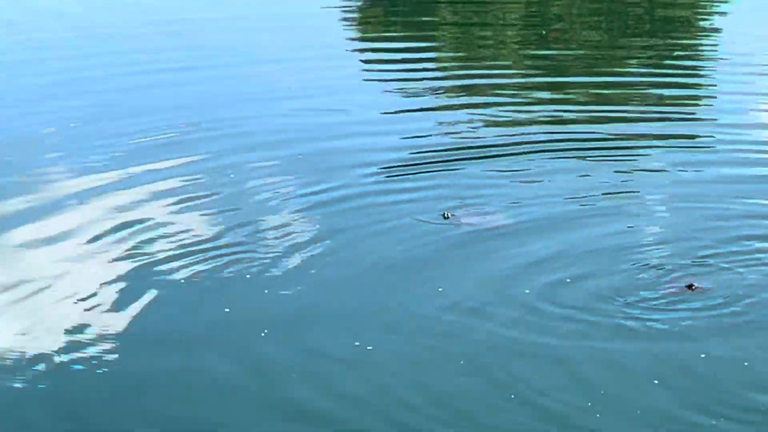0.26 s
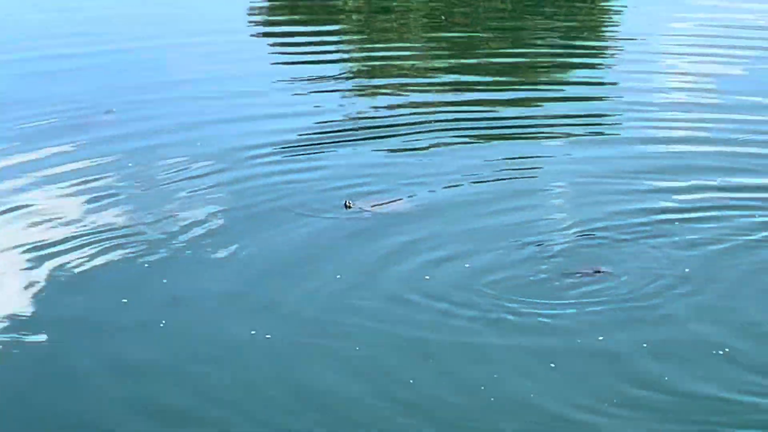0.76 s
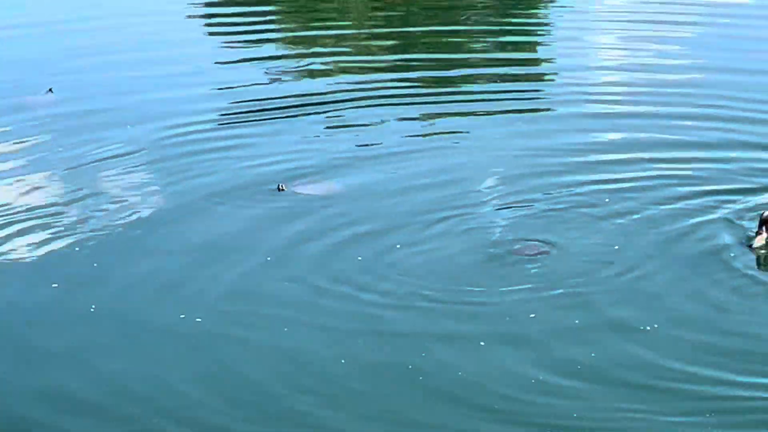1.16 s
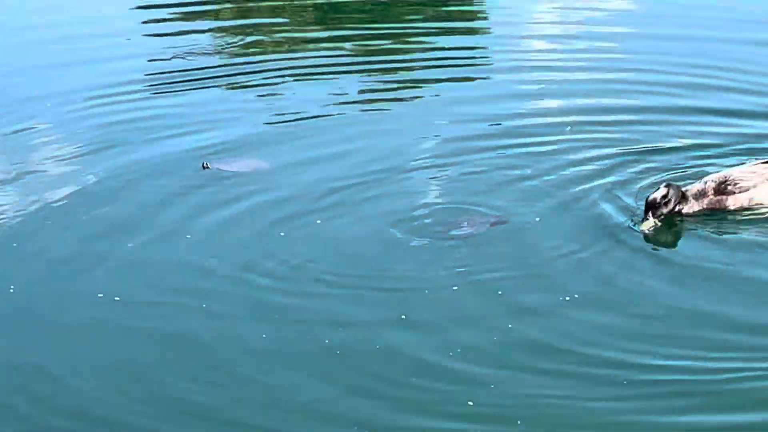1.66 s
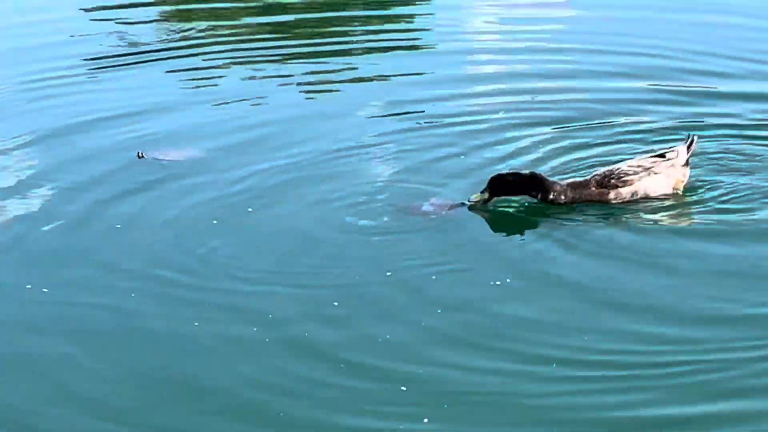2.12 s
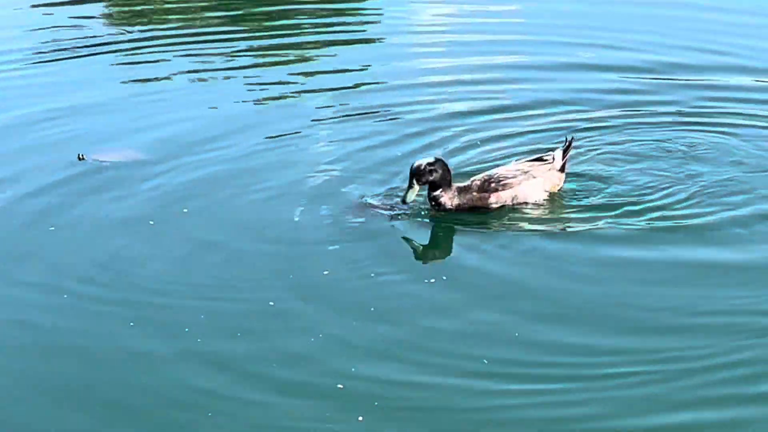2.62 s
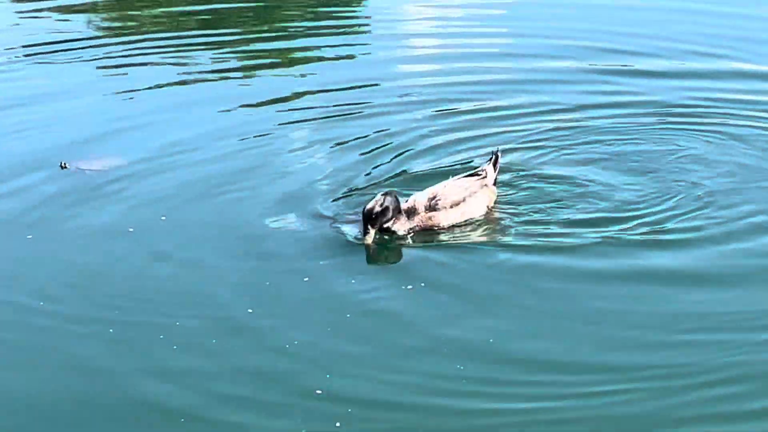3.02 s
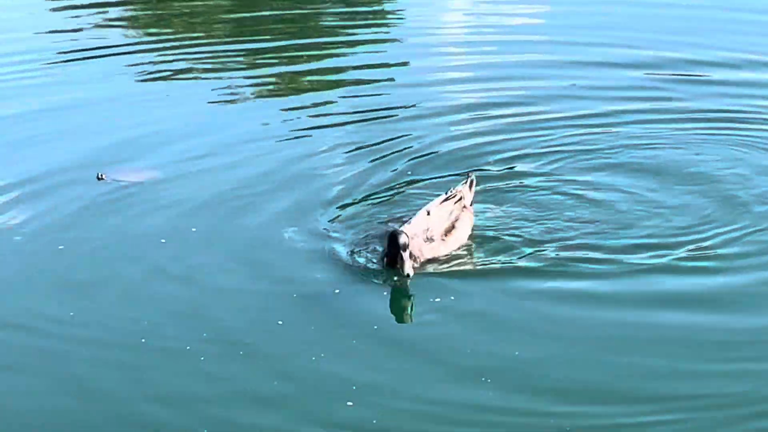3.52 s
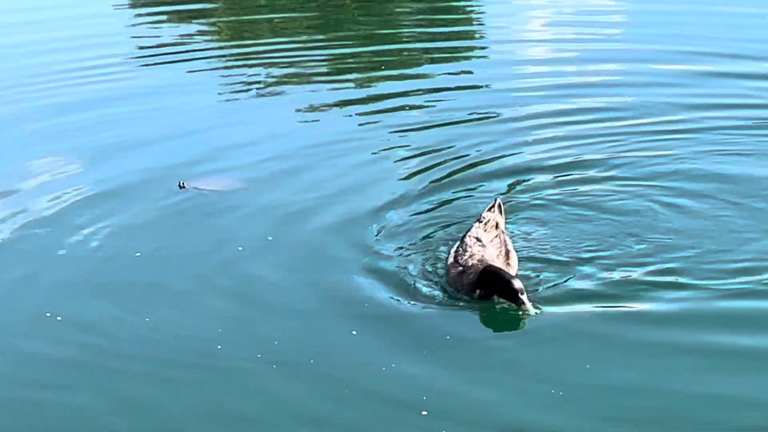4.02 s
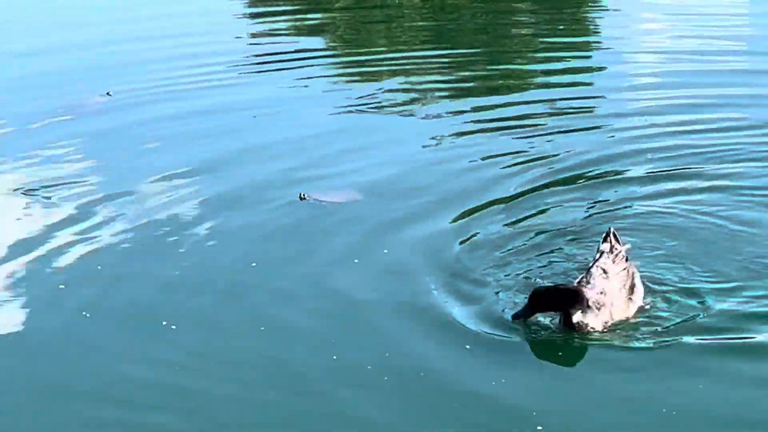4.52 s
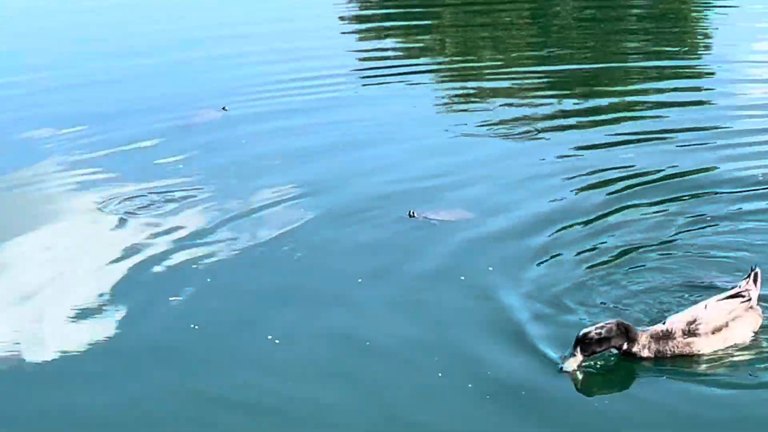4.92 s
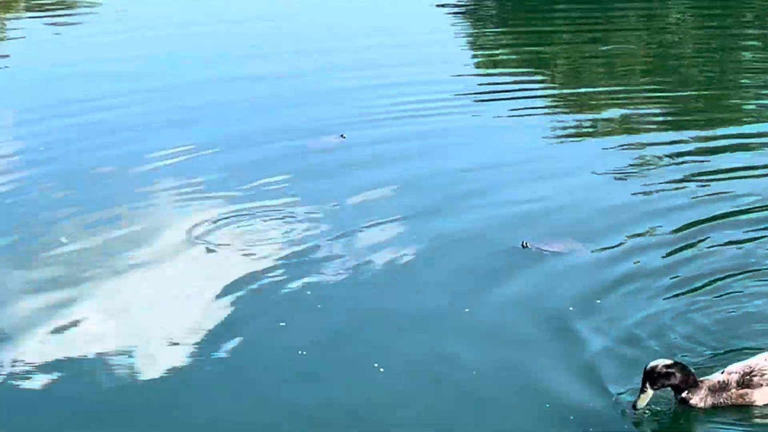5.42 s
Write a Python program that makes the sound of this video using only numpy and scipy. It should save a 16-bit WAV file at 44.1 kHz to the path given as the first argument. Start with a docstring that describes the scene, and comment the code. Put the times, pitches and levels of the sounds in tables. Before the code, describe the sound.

Outdoors by open water, shrill insects buzz without pause in rough, grainy stereo. Gusts flutter and thud directly on an unprotected microphone, building to a rough patch just before halfway, followed by a calmer stretch. Short bird chips with soft echoes appear early, midway and late. Near the end, a duck's bill makes small liquid clicks and plips in front, over a faint wavering engine hum and background rumble.

```python
"""Cicadas drone in the trees to one side of a summer pond, swelling and easing, as gusts buffet the microphone.
The insects are noise gated by uneven click trains; two ports hear them out of step, so the drone is very wide.
Wind is shaped noise with shed eddies and hard buffets; a small bird chips three times in short pitch sweeps.
A dabbling duck makes wet ticks, as snaps, ringing bubbles and drops; a far motor hums in wavering sines
within a rumble of filtered noise."""
import sys
import numpy as np
from scipy import signal
from scipy.fft import rfft, irfft
from scipy.io import wavfile
from scipy.ndimage import uniform_filter1d

SR = 44100
rng = np.random.default_rng(int(sys.argv[2]) if len(sys.argv) > 2 else 0)


def dump(signal):
    """Clip the signal to [-1, 1] and save it as 16-bit WAV at the path in sys.argv[1]."""
    limited = np.clip(np.atleast_2d(signal).T, -1, 1)
    pcm = np.round(limited * 32767).astype(np.int16)
    wavfile.write(sys.argv[1], SR, pcm)


N = 250047
TIME = np.arange(N) / SR
FREQS = np.fft.rfftfreq(N, 1 / SR)

# the duck's bill in the water, levels before the duck's overall gain:
# (time [s], bubble level [dB], ring pitch [Hz], ring time to -60 dB [s], snap peak [dB])
DABBLES = [(1.127, -54, 2220, 0.0083, -61.5), (3.861, -49, 1870, 0.014, -58),
           (4.169, -45.5, 1660, 0.0039, -50), (4.302, -50, 1540, 0.033, -59), (4.761, -50, 2460, .005, -63),
           (4.8178, -40, 2000, 0.009, -50), (4.8235, -44, 2100, .005, -44.5),
           (4.861, -48, 2300, .0065, -58), (4.962, -35.5, 1020, 0.022, -59), (4.978, -41, 780, .011, -43),
           (4.9785, -44, 2680, .0077, -64), (5.17, -34.5, 2600, 0.006, -60)]


def chorus():
    """Amplitude modulation in two bands: the song swells, and turns shriller as its top gains on the drone."""
    # swell of the chorus: (time [s], level of the main drone [dB], level of the shrill top [dB])
    swell = [(0.0, -47.5, -54), (0.33, -48, -54.5), (0.34, -49.5, -59), (0.59, -50.5, -57),
             (1.17, -47.5, -52), (1.39, -47.5, -55), (1.81, -45, -54), (1.9, -46.5, -51),
             (2.26, -45.5, -54.5), (2.81, -45, -50), (3.13, -42.5, -49), (4.01, -45, -52),
             (4.37, -49.5, -58), (5.1, -49.5, -57.5), (5.3, -49, -54), (5.6, -47, -52.5)]
    drone_db, shrill_db = curves(swell)
    # one group sings from the side, two more supply the scattered sound at the ports
    groups = [cicadas(click_hz=228.8, jitter=.08, flutter_db=1.5, blur=.35, count=4) for _ in range(3)]
    song = shimmer(from_trees(*groups), count=6)
    high_pass = signal.butter(4, 6300, "highpass", fs=SR, output="sos")
    shrill = signal.sosfiltfilt(high_pass, song)
    drone = song - shrill
    # each part has unit level in the mean of the two ports
    drone, shrill = (part / part.mean(axis=0).std() for part in (drone, shrill))
    return drone * undb(drone_db) + shrill * undb(shrill_db)


def cicadas(click_hz, jitter, flutter_db, blur, count):
    """Source and resonator: tymbals buckle in fast uneven trains of short bursts, coloured by the body."""
    # resonance of the insects' bodies: (frequency [Hz], level [dB])
    body = [(2700, -35), (3200, -22.0), (4050, -9.0), (4550, -7.4), (5450, 0.0), (5950, -0.3), (6550, -3.6),
            (7550, -15.7), (8400, -19.0), (9600, -29.6), (11500, -27.5), (12800, -33.0), (14000, -38.9)]
    power = np.zeros(N)
    for _ in range(count):
        rate = click_hz * rng.uniform(0.54, 1.4) * (1 + jitter * walk(40))
        phase = np.cumsum(rate) / SR % 1
        burst = np.exp(-phase / 1.06)
        power += (burst * undb(flutter_db * walk(70))) ** 2
    # foliage smears part of the song into an even hiss
    envelope = np.sqrt(power + blur * power.mean())
    return colour(envelope * rng.standard_normal(N), body)


def shimmer(song, count):
    """Independent modulation by band: insects of different pitch swell and ease on their own."""
    depth_db, changes_per_s = 1.0, 30
    whole = rfft(song)
    centres = np.geomspace(3500, 9000, count)
    total = 0
    # overlapping triangular bands that add up to the whole song
    for peak in np.eye(count):
        band = irfft(whole * np.interp(FREQS, centres, peak), N)
        total = total + band * undb(depth_db * walk(changes_per_s))
    return total


def from_trees(direct, stray_left, stray_right):
    """Interaural phase and coherence: sound from one side leads at the left, scattered sound is unrelated."""
    # the two ports: (frequency [Hz], phase by which left leads [rad], power share of scattered sound [0-1])
    ports = [(1800, 0, .3), (2600, 2.4, .15), (3300, 1.2, .15), (4000, .9, .09), (4550, 1.45, .08),
             (5100, 1.45, .08), (5850, 3.1, .005), (6200, 3.25, .015), (7200, 5.1, .16), (7650, 6.2, .04),
             (8750, 6.5, .1), (9650, 9.4, .02), (10850, 9.45, .02), (11800, 12.4, .04)]
    lead, share = spectra(ports)
    share = np.clip(share, 0, 1)
    straight = rfft(direct) * np.exp(.5j * np.array([lead, -lead]))
    stray = rfft(np.array([stray_left, stray_right]))
    return irfft(np.sqrt(1 - share) * straight + np.sqrt(share) * stray, N)


def wind():
    """Turbulent pressure on the ports: rumble, eddies and buffets, with a flutter that grows faster than the gust."""
    # fast flutter inside the eddies: (frequency [Hz], level [dB])
    flutter_spectrum = [(80, -4.5), (220, 6), (380, -6), (580, -12), (720, -17), (900, -22), (2000, -72)]
    # swirls that differ at the ports: (frequency [Hz], level [dB])
    apart_spectrum = [(20, -14), (60, -5.0), (130, -2.5), (300, -11.5), (550, -14.5), (1000, -48), (2000, -38.5)]
    gust_db = gusts()
    eddies = shedding(gust_db)
    rumble = turbulence() * undb(gust_db - 0.5)
    force = np.sqrt(uniform_filter1d(eddies ** 2, size=600) + undb(gust_db - 3.5) ** 2)
    flutter_db = -6.5 + .5 * (gust_db - gust_db.max()) + 2.2 * walk(70)
    flutter = colour(rng.standard_normal(N), flutter_spectrum) * force * undb(flutter_db)
    # this layer enters the ports with opposite sign
    apart = colour(rng.standard_normal(N), apart_spectrum) * undb(gust_db - 9.5)
    return widen(rumble + flutter + eddies + buffets(), apart)


def gusts():
    """Addition of powers: each gust swells and dies away over a light breeze; returns strength in dB."""
    # gusts: (time of the height [s], strength [dB], rise [s], fall [s])
    swells = [(.17, -41.5, 0.12, 0.13), (.78, -47, 0.095, 0.22), (1.5, -38.5, 0.029, 0.043),
              (2.25, -41, 0.51, 0.32), (2.62, -36.5, 0.18, 0.13), (2.93, -42, 0.047, 0.091),
              (3.258, -39.5, 0.067, 0.087), (4.37, -45, 0.036, 0.11), (5.0, -43.5, 0.12, 0.092)]
    breeze_db, lull_s, lull_width_s = -53, 3.9, 0.85
    # the breeze has one lull
    lull = np.exp(-((TIME - lull_s) / lull_width_s) ** 4)
    power = undb(breeze_db) ** 2 * (1 - lull)
    for s, db, rise, fall in swells:
        width = np.where(TIME < s, rise, fall)
        power = power + undb(db) ** 2 * np.exp(-((TIME - s) / width) ** 2)
    return 10 * np.log10(power + 1e-9)


def turbulence():
    """Broadband turbulence: low swirling pressure, compressed toward an even strength."""
    # spectrum of the swirl: (frequency [Hz], level [dB])
    wind_spectrum = [(15, -37), (30, -30), (48, 6), (78, 5), (125, 3), (200, -9), (320, -16.5), (500, -39),
                     (900, -45), (2000, -92)]
    swirl = colour(rng.standard_normal(N), wind_spectrum)
    return unit(swirl / np.sqrt(uniform_filter1d(swirl ** 2, size=1500) + 0.046))


def shedding(gust_db):
    """Vortex shedding: eddies come in a loose train, following the strength of the wind that sheds them."""
    shed_per_s, jitter_periods, spread_db = 14, 0.31, 4
    # typical pitch at the greatest wind strength, and its rise with strength
    eddy_hz, octaves_per_db = 103, 0.02
    # typical peak over the wind's strength, and Gaussian half-length
    over_gust_db, half_cycles = 2.3, 0.55
    air = np.zeros(N)
    for k, (late, strength, size) in enumerate(rng.standard_normal(size=(150, 3))):
        s = (k + 1 + jitter_periods * late) / shed_per_s
        if 0 < s < TIME[-1]:
            db = np.interp(s, TIME, gust_db)
            octaves = octaves_per_db * (db - gust_db.max()) + 0.2 * size
            swirl = eddy(eddy_hz * 2 ** octaves, half_cycles)
            add(air, max(s - .05, 0), undb(db + over_gust_db + spread_db * strength) * swirl)
    return air


def eddy(hz, half_cycles):
    """Scaling of vortices: a swirl of fixed cycle count, centred in a tenth of a second, is shorter when higher."""
    cycles = hz * (TIME[:SR // 10] - .05)
    return np.exp(-.5 * (cycles / half_cycles) ** 2) * np.cos(2 * np.pi * (cycles + rng.random()))


def buffets():
    """Pressure pulse and vortex: a hard puff slaps the ports, then rolls past as a deep swirl."""
    # hard buffets: (slap time [s], slap peak [dB], slap top [Hz], lag of the swirl's centre [s],
    # swirl envelope peak [dB], swirl pitch [Hz])
    puffs = [(.043, -43, 280, .006, -31.5, 86), (.172, -34, 300, 0.0089, -30, 90),
             (.238, -38, 300, 0.0062, -37, 100), (.292, -30, 290, .005, -34, 140),
             (.32, -45, 258, 0.0073, -28, 85), (.598, -34.5, 280, .007, -38, 85),
             (.747, -29, 280, 0.0061, -27, 88), (0.793, -36, 260, 0.007, -36, 110),
             (1.46, -36, 280, 0.0054, -40, 109), (1.747, -25, 340, .008, -26.5, 106),
             (1.797, -41, 450, 0.0026, -31.5, 90), (1.876, -38, 400, 0.0036, -33, 100),
             (1.91, -28, 366, .007, -33, 140), (1.956, -29, 300, .016, -26, 91),
             (1.981, -30.5, 320, 0.014, -34, 110), (2.029, -23.5, 328, 0.01, -28, 105),
             (2.099, -27, 290, 0.0087, -28.5, 85), (2.174, -29.5, 447, 0.02, -26, 89),
             (2.236, -29, 475, .018, -24, 107), (2.299, -26, 367, 0.011, -29, 90),
             (2.348, -33, 480, .024, -22.5, 77), (2.408, -36, 420, .012, -29, 90),
             (2.443, -33, 420, .014, -28.5, 85), (2.471, -26.5, 596, .012, -25.5, 99),
             (2.498, -23.5, 350, 0.0065, -30, 129), (2.532, -16.5, 550, 0.0036, -20.5, 153),
             (2.538, -27, 482, 0.0049, -24.5, 113), (2.566, -30, 496, 0.0116, -26, 124),
             (2.597, -28.5, 342, 0.0045, -31, 95), (2.616, -33, 616, 0.0088, -30, 100),
             (2.63, -24.5, 520, 0.0066, -24.5, 74.5), (2.651, -27.5, 394, 0.0045, -35, 90),
             (2.674, -29, 636, .012, -24.5, 90.5), (2.714, -27, 330, 0.013, -28, 82),
             (2.9, -42, 278, 0.0048, -31, 76), (2.996, -36, 300, .008, -35, 111),
             (3.19, -34, 453, 0.011, -30.5, 146), (3.247, -40, 300, 0.0066, -30, 89),
             (3.31, -37, 450, 0.0042, -33, 86), (4.338, -44, 260, 0.0058, -32, 99),
             (4.906, -40, 260, 0.0075, -34, 79.5), (4.954, -42, 260, 0.0051, -33, 90),
             (5.016, -34, 270, 0.0095, -29, 127), (5.136, -43, 260, 0.0064, -33, 95)]
    air = np.zeros(N)
    for s, slap_db, top_hz, lag, swirl_db, hz in puffs:
        add(air, s, undb(slap_db) * slap(top_hz))
        add(air, max(s + lag - .05, 0), undb(swirl_db) * eddy(hz, half_cycles=0.58))
    return air


def slap(top_hz):
    """Impulse response of a band: a sudden push of air is a dull thump, scaled to a peak of one."""
    width_octaves, soft_hz = 1.79, 297
    dull = signal.butter(9, top_hz, fs=SR, output="sos")
    body = signal.butter(3, top_hz / 2 ** width_octaves, "highpass", fs=SR, output="sos")
    soften = signal.butter(1, soft_hz, fs=SR, output="sos")
    push = signal.sosfilt(np.vstack([dull, body]), signal.unit_impulse(SR // 10))
    push = signal.sosfilt(soften, push)
    return push / abs(push).max()


def bird():
    """Frequency modulation: one short chip, a flick down and a louder rise, repeats with a soft echo."""
    # chips: (time [s], level [dB], reach of the pitch sweep about its base [share])
    calls_table = [(1.195, -41.5, 1.05), (2.694, -41.5, .7), (4.489, -44.5, .85)]
    # course of one chip: (time from its start [s], pitch at full reach [Hz], level within the chip [dB])
    course = [(0, 4000, -17), (.008, 3700, -11), (.014, 3250, -10), (.022, 3120, -20), (.039, 3150, -15),
              (.046, 3230, -4), (.058, 3400, -2), (.064, 3520, -6), (.069, 3640, -26)]
    base_hz = 3170
    s, pitch, loud = np.transpose(course)
    t = TIME[:int(s[-1] * SR)]
    calls = np.zeros(N)
    for start, db, reach in calls_table:
        hz = base_hz + reach * (np.interp(t, s, pitch) - base_hz)
        level = undb(db + np.interp(t, s, loud))
        chip = level * np.sin(2 * np.pi * np.cumsum(hz) / SR)
        add(calls, start, chip)
        # the far bank answers
        add(calls, start + .045, undb(-11) * chip)
    direct = calls + undb(-9) * scatter(calls, 0.46)
    return from_trees(direct, scatter(calls, 0.33), scatter(calls, 0.37))


def duck():
    """Impulse and bubble resonance: the bill snaps at the surface and bursts small bubbles, out in front."""
    snap_band_hz = (784, 2270)
    ticks = droplets(count=4)
    band_pass = signal.butter(4, snap_band_hz, "bandpass", fs=SR, output="sos")
    snap = signal.sosfilt(band_pass, signal.unit_impulse(SR // 100))
    snap = snap / abs(snap).max()
    for s, db, hz, t60, snap_db in DABBLES:
        add(ticks, s, undb(snap_db) * snap)
        pop = ring(hz, t60)
        # a bubble that rings longer also takes longer to pinch off
        onset = 1 - np.exp(-TIME[:len(pop)] / (0.038 * t60))
        add(ticks, s, undb(db) * pop * onset)
    banks = undb(-17) * scatter(ticks, .2)
    side = undb(-6) * scatter(ticks, .006)
    return undb(5.0) * widen(ticks + banks, side)


def droplets(count):
    """Bubble resonance at random: each dabble throws a few drops that patter back on the water."""
    # typical delay and pitch, spread of pitch, typical level relative to the bubble, ring time
    delay_s, drop_hz, spread_octaves, under_db, t60_s = .035, 1600, 0.42, -20, 0.0083
    patter = np.zeros(N)
    for s, db, *_ in DABBLES:
        for late, pitch, size in rng.standard_normal(size=(count, 3)):
            drop = ring(drop_hz * 2 ** (spread_octaves * pitch), t60_s)
            add(patter, s + delay_s * abs(late), undb(db + under_db + 2 * size) * drop)
    return patter


def ring(hz, t60):
    """Damped oscillation: a small bubble dies away, its pitch creeping up as it nears the surface."""
    rise = .12  # share of the pitch gained over one ring time
    t = TIME[:SR // 10]
    # half the rise here makes the full rise in instantaneous pitch
    cycles = hz * t * (1 + .5 * rise * t / t60)
    return np.sin(2 * np.pi * cycles) * np.exp(-np.log(1000) * t / t60)


def distance():
    """Harmonic hum in broadband noise: a far motor wavers inside the general rumble of the surroundings."""
    # spectrum of the rumble: (frequency [Hz], level [dB])
    far_spectrum = [(22, -38), (45, 3), (90, 4), (170, 4), (260, 3.5), (370, -1), (480, -10.5),
                    (680, -15.5), (980, -14.5), (1350, -23), (2100, -23.5), (2900, -33), (6000, -62),
                    (15000, -102)]
    # course of the bass, before its random waver: (time [s], level [dB])
    far_level = [(0, -47), (.6, -47), (1.2, -46.5), (1.5, -45), (1.8, -47.5), (2.6, -48), (2.85, -52.5),
                 (3.6, -50), (4.15, -45.5), (4.8, -45.5), (5.67, -45.5)]
    # motor tones where that course is loudest, before their waver: (frequency [Hz], rms level [dB])
    motor_tones = [(118.4, -57), (176, -52.5), (252, -57.5), (294, -60.5), (353, -59), (410, -60.5),
                   (469, -64.5), (528, -71)]
    # side relative to middle: (frequency [Hz], level [dB])
    side_spectrum = [(150, -20.5), (360, -11), (650, -2.5), (1200, -13.5), (2500, 2.5)]
    far_db, = curves(far_level)
    mid, side = (colour(rng.standard_normal(N), far_spectrum) for _ in range(2))
    side = irfft(rfft(side) * undb(spectra(side_spectrum)[0]), N)
    around = widen(mid, side)
    # the bass comes and goes while the faint hiss above it stays nearly steady
    bass = signal.sosfiltfilt(signal.butter(2, 550, fs=SR, output="sos"), around)
    hiss = (around - bass) * undb(-43.0 + .7 * walk(8))
    rumble = bass * undb(far_db + 1.23 * walk(11)) + hiss
    # all tones share one wandering speed
    turns = np.cumsum(1 + 0.00587 * walk(6)) / SR
    hum = np.zeros(N)
    for hz, db in motor_tones:
        tone = np.sin(2 * np.pi * (hz * turns + rng.random()))
        hum += np.sqrt(2) * undb(db + 2.76 * walk(4)) * tone
    return rumble + hum * undb(far_db - far_db.max())


def scatter(x, t60):
    """Diffuse reverberation: many faint reflections from leaves and banks, by a noise tail of unit energy."""
    t = TIME[:SR // 2]
    tail = rng.standard_normal(len(t)) * np.exp(-np.log(1000) * t / t60)
    return signal.fftconvolve(x, tail / np.linalg.norm(tail))[:N]


def widen(mid, side):
    """Sum and difference: left and right from middle and side."""
    return np.array([mid + side, mid - side])


def colour(x, spectrum):
    """Linear filtering: give a sound the shape of a (frequency [Hz], level [dB]) table, at unit rms."""
    return unit(irfft(rfft(x) * undb(spectra(spectrum)[0]), N))


def walk(rate):
    """Low-passed chance: random steps, rate per second, smoothed to a drift of unit rms."""
    k = int(SR / rate)
    steps = np.repeat(rng.standard_normal(N // k + 1), k)
    smooth = uniform_filter1d(uniform_filter1d(steps, k), k)
    return unit(smooth[:N])


def curves(table):
    """Linear interpolation: each column of a timed table, joined by straight lines."""
    s, *columns = np.transpose(table)
    return [np.interp(TIME, s, c) for c in columns]


def spectra(table):
    """Logarithmic interpolation: each column of a frequency table, joined on a log axis."""
    hz, *columns = np.transpose(table)
    return [np.interp(np.log(FREQS + 1), np.log(hz), c) for c in columns]


def add(out, s, sound):
    """Superposition: mix a short sound in at time s."""
    i = int(s * SR)
    out[i:i + len(sound)] += sound[:N - i]


def undb(db):
    """Logarithmic level: decibels to amplitude gain."""
    return 10 ** (np.asarray(db) / 20)


def unit(x):
    """Mean power: scale to an rms of one."""
    return x / np.sqrt(np.mean(x ** 2))


def scene():
    """Superposition: everything heard from the bank."""
    return chorus() + wind() + bird() + duck() + distance()


def record(dry):
    """Band limiting: a high-pass drops the deepest rumble and a steep elliptic low-pass cuts the top."""
    low_hz, top_hz = 35, 13800
    lean = signal.sosfilt(signal.butter(5, low_hz, "highpass", fs=SR, output="sos"), dry)
    return signal.sosfilt(signal.ellip(8, .2, 70, top_hz, fs=SR, output="sos"), lean)


dry = scene()
out = record(dry)
dump(out)
```